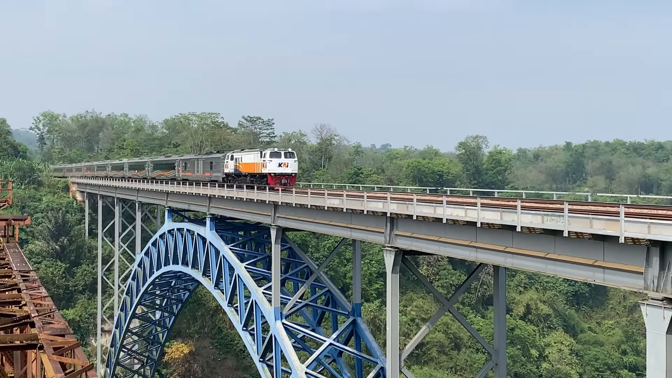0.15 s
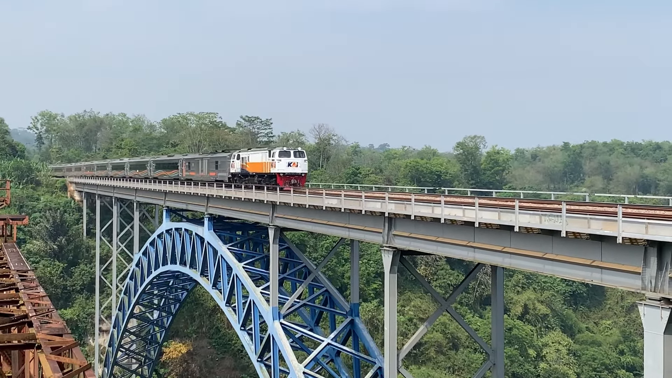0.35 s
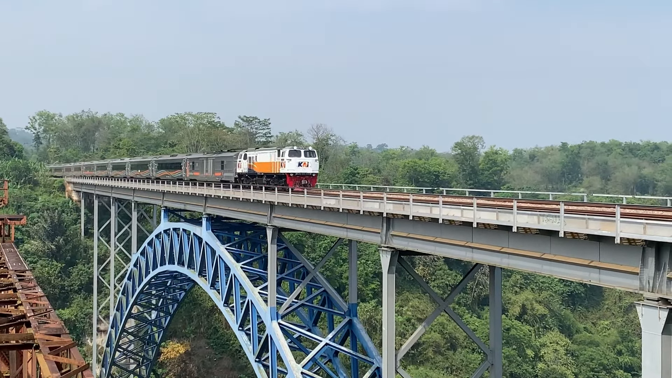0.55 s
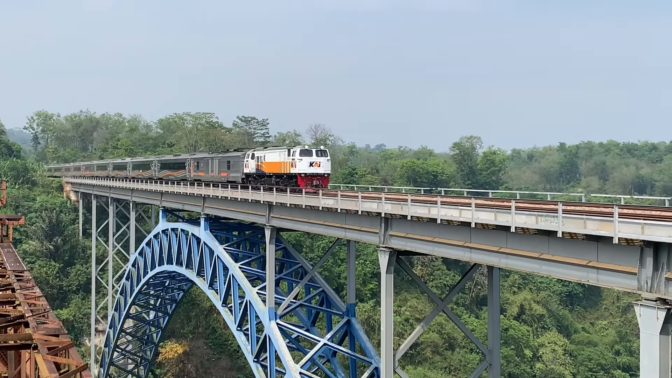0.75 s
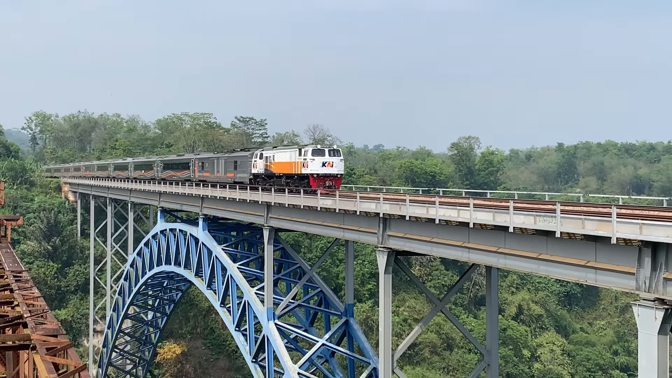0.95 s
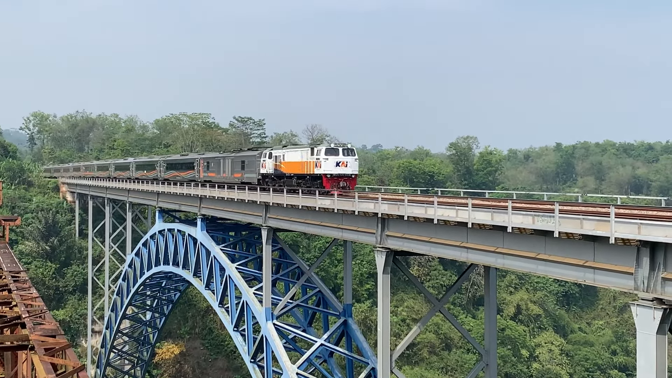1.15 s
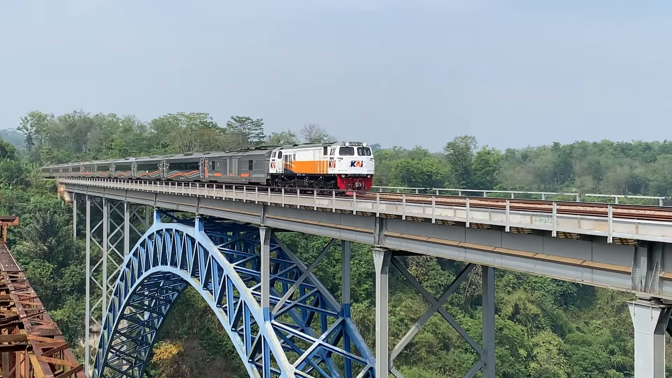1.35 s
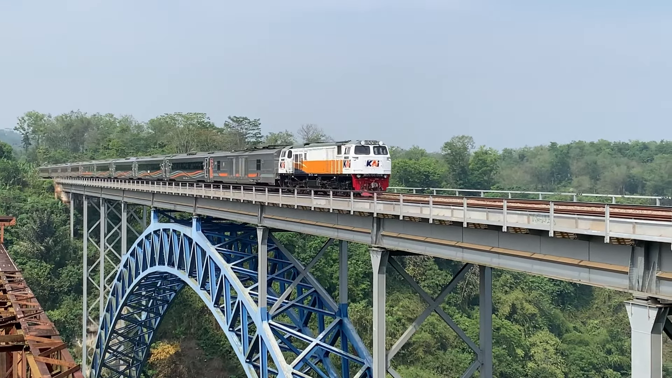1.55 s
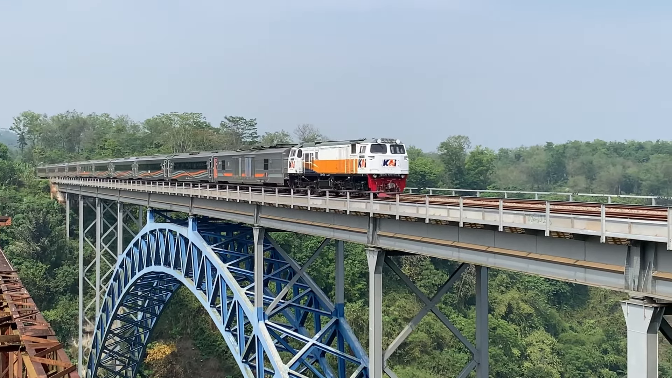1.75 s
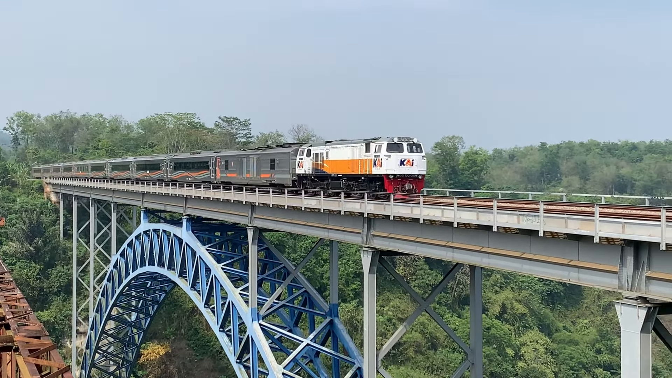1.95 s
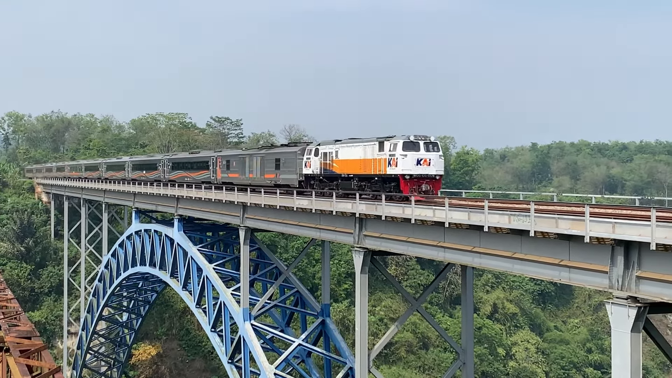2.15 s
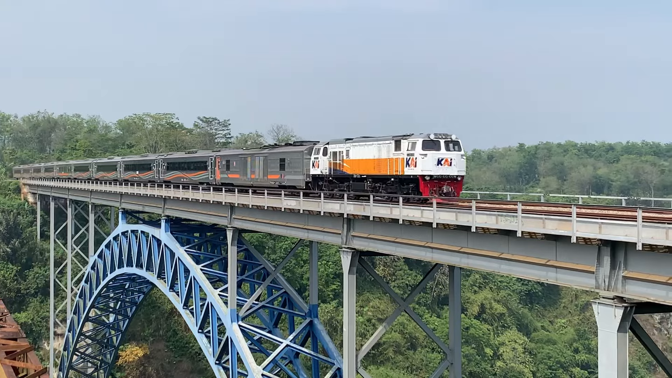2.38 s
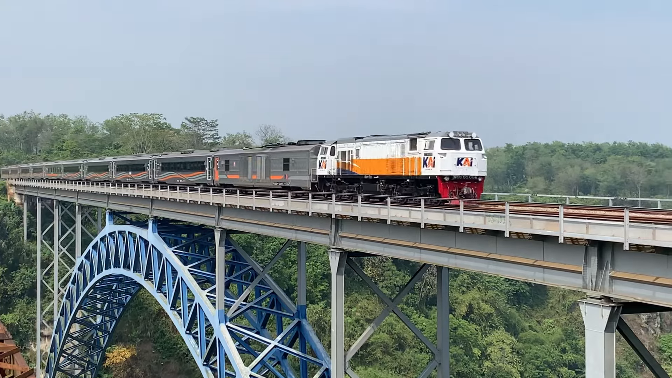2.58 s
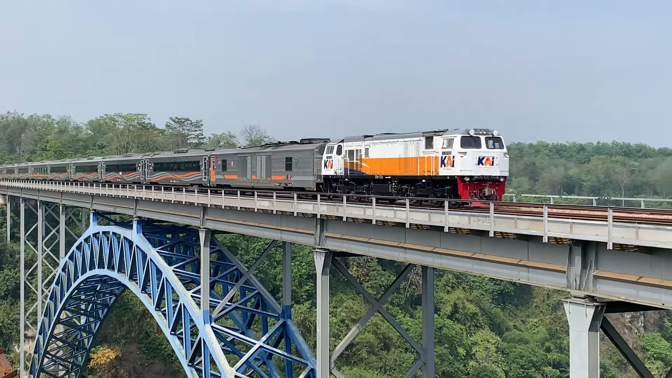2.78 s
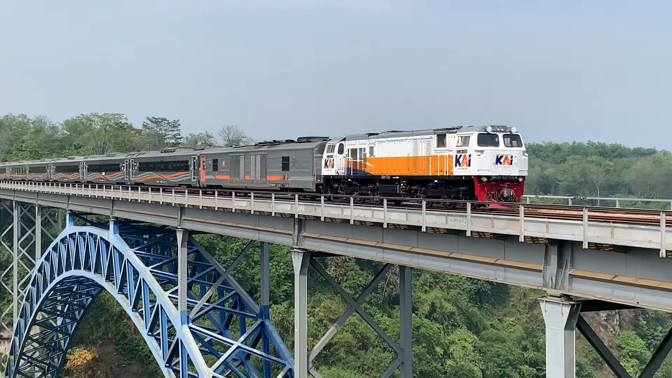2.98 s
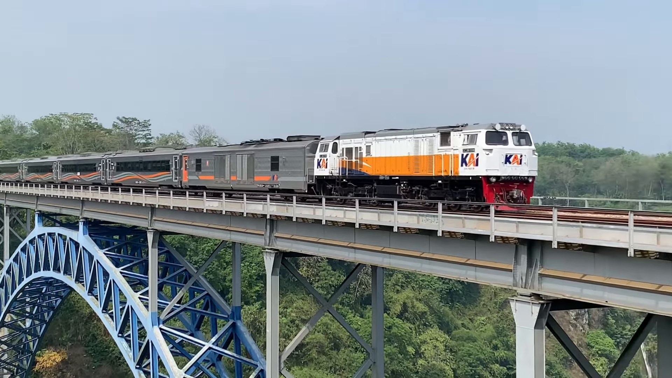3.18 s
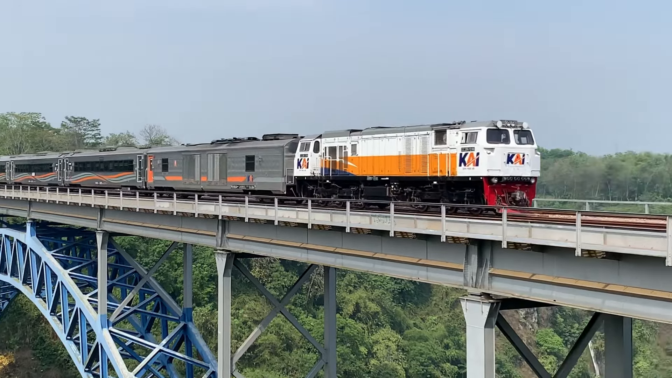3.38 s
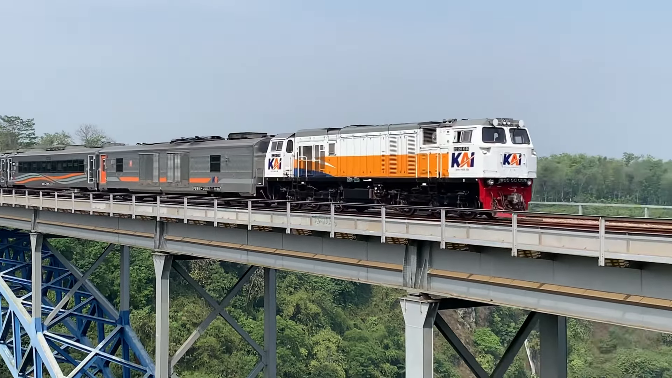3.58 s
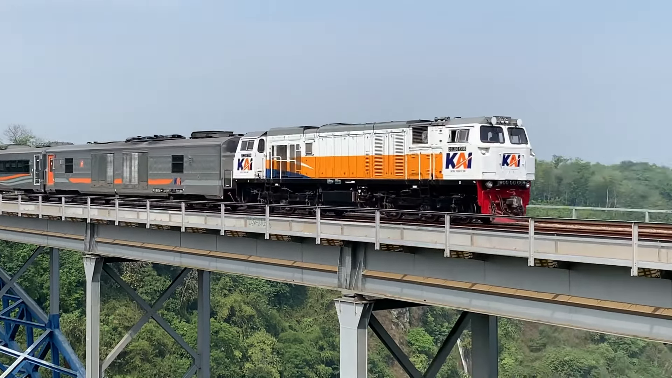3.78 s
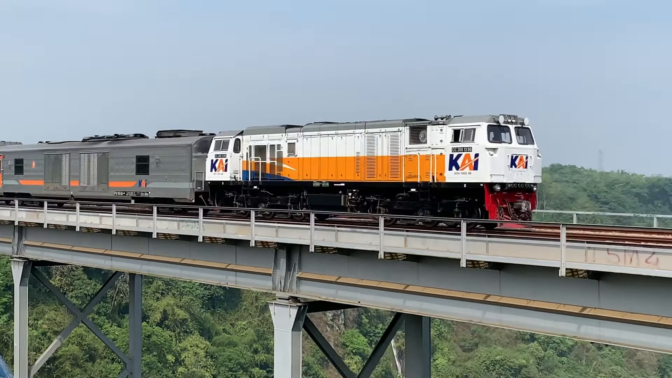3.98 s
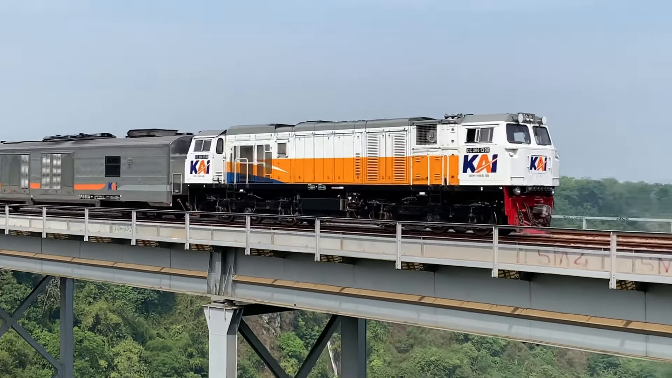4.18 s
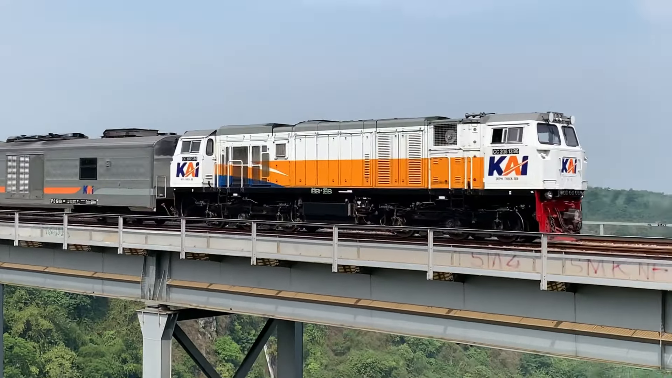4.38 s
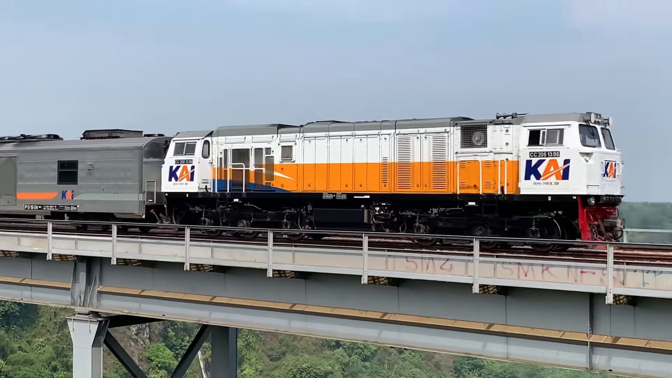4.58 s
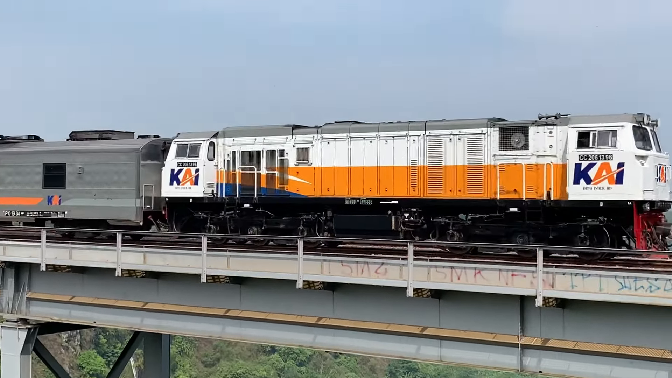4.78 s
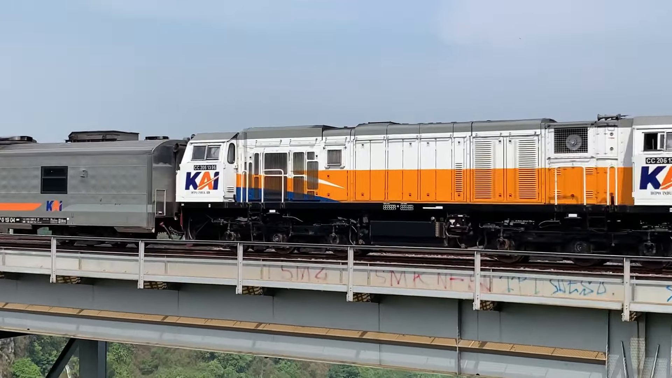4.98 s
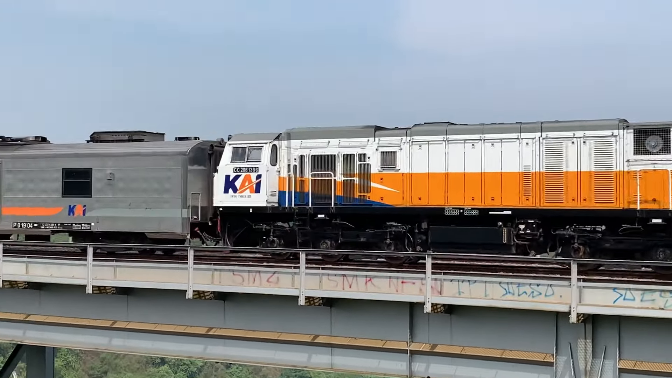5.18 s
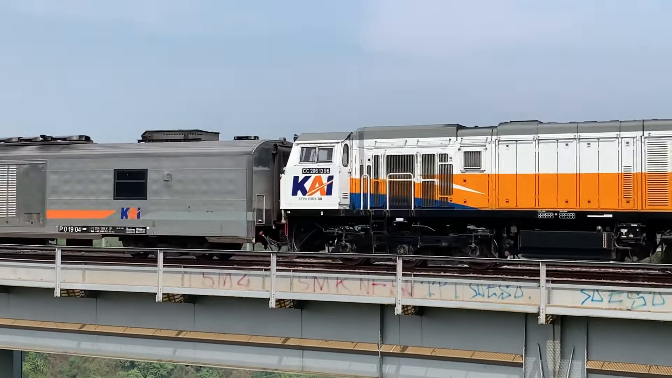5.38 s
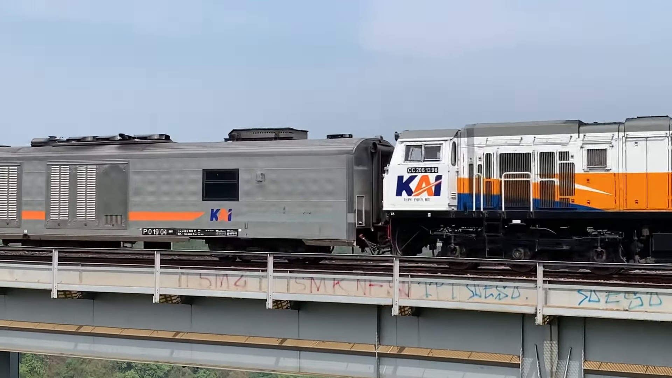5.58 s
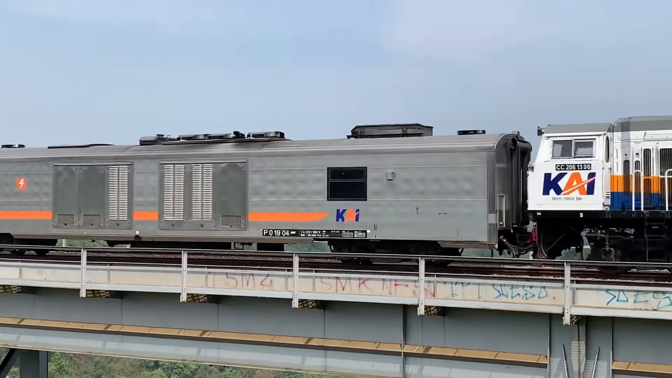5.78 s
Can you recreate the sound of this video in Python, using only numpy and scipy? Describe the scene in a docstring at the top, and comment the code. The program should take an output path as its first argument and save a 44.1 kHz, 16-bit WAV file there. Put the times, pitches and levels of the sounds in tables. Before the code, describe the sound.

A throbbing diesel train draws near on a droning steel bridge, its wheels hissing, ringing and clacking louder as it comes level.

```python
"""A diesel train approaches over a steel bridge, heard from the side of a valley.
At first the engine throbs far off, the deck rumbles and the girders drone, with insects faint in the trees.
Rough wheels and rails roll, hiss and ring; after a second or so the deck thumps and rail joints clack.
From about two seconds gears whine. As the engine draws level the sound swells and brightens,
and the Doppler-raised pitch of wheels and gears falls."""
import sys
import numpy as np
from scipy import signal
from scipy.fft import rfft, irfft, next_fast_len
from scipy.io import wavfile
from scipy.ndimage import uniform_filter1d, map_coordinates

SR = 44100
rng = np.random.default_rng(int(sys.argv[2]) if len(sys.argv) > 2 else 0)


def dump_mix(stems):
    """Bounce the given channels to the path in sys.argv[1] as a 16-bit WAV at rate SR."""
    frames = np.atleast_2d(stems).T  # one column per channel
    limited = np.clip(frames, -1, 1)  # hard clip at full scale
    pcm = np.round(limited * 32767).astype(np.int16)
    wavfile.write(sys.argv[1], SR, pcm)


N = 257544

# Noise spectra of the sources: frequency_hz, relative_density_db
DECK_SPECTRUM = [(50, -49), (80, -9.5), (103, -4), (134, -1), (168, -3.5), (232, -2.5), (336, -7),
                 (400, -15), (520, -27.5), (880, -120)]
GIRDER_SPECTRUM = [(240, -38), (400, -9), (481, 0), (531, -1.5), (716, -6.5), (800, -9), (915, -14.5),
                   (1000, -12), (1230, -14.5), (1320, -21.5), (1400, -23), (1820, -25), (3080, -120)]
ENGINE_SPECTRUM = [(15, -57), (30, -40), (40, -4.5), (48, -7.5), (66, 1.5), (85, 0.5), (110, -20),
                   (200, -81)]
ROLLING_SPECTRUM = [(900, -51), (1400, 3.5), (1650, -2.5), (2050, -1), (2330, -1), (2500, -2.5),
                    (2680, -2.5), (2900, 0), (3160, -1.5), (3450, -3), (3700, -2.5), (4050, -6), (4300, -4),
                    (4520, -8), (4700, -8), (5200, -31), (7000, -27.5)]
HISS_SPECTRUM = [(3500, -30), (5000, 0), (6500, -2), (8000, -3), (10000, -6.5), (12000, -10.5),
                 (14000, -16), (15100, -21)]
INSECT_SPECTRUM = [(4200, -29), (4580, 0), (4680, 5), (4850, 10), (4950, -12), (5300, -68)]
TREE_SPECTRUM = [(300, -2), (1000, -10), (2000, -4), (4000, -1), (5200, -10), (6200, 3), (8000, -25),
                 (11000, -30), (11800, -55), (15000, -70)]
# Levels as the engine runs onto nearer spans: time_s, deck_db, girder_db, hiss_db, engine_db
APPROACH_LEVELS = [(0, -28, -37.5, -63.5, -34.5), (.5, -25, -37.5, -64.5, -32), (1, -26, -35.5, -60.5, -32),
                   (1.41, -26, -34.5, -58, -28.5), (1.52, -21.5, -31.5, -51, -31),
                   (1.82, -22.5, -32.5, -49.5, -28.5), (1.96, -24.5, -32, -56.5, -28),
                   (2.12, -20, -31, -49.5, -25.5), (2.5, -22.5, -31, -48, -31), (3.05, -23, -31, -50, -29),
                   (3.38, -20.5, -29.5, -46.5, -34), (3.72, -21, -28, -44, -21.5), (4, -21, -27, -46, -30),
                   (4.25, -20, -27, -43, -24.5), (4.58, -19, -27.5, -41.5, -21),
                   (4.7, -17, -24, -41.5, -21.5), (4.95, -16, -23.5, -37.5, -22),
                   (5.08, -16.5, -25, -40, -19.5), (5.4, -17, -23, -39, -21.5),
                   (5.84, -17, -25, -40.5, -22.5)]
# Resonances at rest: pitch_hz, width_hz, relative_level_db, flicker_db, start_s, end_s
GIRDER_MODES = [(480, 50, -9.5, 1, .75, 4.12), (478, 40, -10, 1.5, 4.75, 5.52), (700, 90, -9, 1, 0, .7),
                (620, 70, -12, 1.5, 4.6, 6), (745, 140, -9, 1, 4.6, 6)]
WHEEL_MODES = [(945, 50, -8.5, 1.5, .75, 2.1), (945, 60, -12, 1.5, 2.15, 4.3),
               (2040, 280, -11, 1, 1.52, 1.85), (2860, 200, -14.5, 2, 3.9, 5.45),
               (2885, 90, -12, 1.5, 0, 2.2), (2900, 60, -10.5, 1.5, 2.3, 4.7),
               (2895, 60, -11, 1.5, 4.87, 5.45), (2890, 90, -11, 2, 5.64, 6),
               (4190, 60, -17.5, 2, 3.1, 3.65), (4170, 110, -21, 2, 4.1, 6),
               (3955, 50, -15, 1.5, 4.98, 5.28), (5815, 70, -22, 2, 5.42, 5.8),
               (9020, 60, -27, 3, 1.66, 1.78), (1145, 150, -4.5, 1.5, 1, 3.8),
               (1160, 260, -5.5, 1.5, 3.95, 6), (975, 170, -6, 1.5, 4.4, 6), (1840, 150, -10, 1.5, 0, 6),
               (1985, 170, -11.5, 1.5, 0, 6), (2000, 40, -15, 1.5, .75, 1.4),
               (2410, 110, -13, 1.5, .7, 1.5), (2385, 190, -13, 1, 0, 6), (2170, 200, -14, 1, 4.4, 6),
               (3210, 120, -14, 1.5, 0, 4.95), (3400, 90, -14, 1.5, 0, 3.4),
               (3380, 100, -13, 1.5, 3.45, 5.2), (3310, 260, -12.5, 1, 5, 6), (3670, 60, -16, 1.5, 0, 4.9),
               (3665, 90, -18, 1.5, 5, 6), (3660, 30, -17, 1.5, 3.3, 3.75), (3665, 30, -15, 1.5, 4.3, 4.75)]
# Blows on the deck: start_s, level_db, pitch_hz
DECK_BLOWS = [(1.371, -12.5, 271), (1.608, -7, 103), (2.042, -6, 105), (2.709, -8, 234), (3.753, -1.5, 137),
              (4.702, -8, 82.6), (4.76, -3.5, 205), (4.845, -8, 184), (4.921, -9, 62), (5.11, -5, 137),
              (5.346, -6, 137), (5.391, 2, 157), (5.43, -2, 206), (5.52, -15, 209), (5.599, -5.5, 129)]
# Brief surges of a wheel mode: peak_s, heard_pitch_hz, peak_db, length_s
WHEEL_FLARES = [(0.667, 3080, -48, 0.05), (1.771, 1004, -33, 0.042), (1.988, 3010, -38, 0.04),
                (2.356, 3060, -32, 0.043), (2.473, 3100, -30, 0.0088), (2.552, 3000, -39, .03),
                (2.84, 1187, -33, 0.047), (3.06, 1226, -34.5, 0.078), (3.107, 3060, -28.5, 0.016),
                (3.245, 1225, -30, 0.018), (3.308, 3120, -35.5, 0.046), (3.35, 1180, -37, .06),
                (3.41, 3800, -43, 0.045), (3.841, 3070, -36, 0.049), (3.957, 3070, -28, 0.043),
                (4.182, 3005, -35, 0.036), (4.195, 4390, -37, 0.041), (4.36, 3090, -30, 0.034),
                (4.435, 3020, -28, 0.046), (4.444, 4370, -39, 0.036), (4.526, 3080, -28.5, 0.09),
                (4.619, 4330, -37, .06), (4.7, 4340, -36.5, 0.08), (4.872, 3020, -22.5, 0.035),
                (4.97, 3490, -30.5, 0.052), (5.051, 3000, -21.5, 0.031), (5.165, 2995, -31, 0.04),
                (5.23, 2975, -38, 0.045), (5.22, 1830, -29, 0.029), (5.43, 5935, -45, 0.032),
                (5.49, 1150, -22, 0.015), (5.582, 5935, -40, 0.042), (5.614, 4265, -32.5, 0.086),
                (5.672, 5950, -43, 0.066), (5.778, 4230, -37, 0.056), (5.619, 1044, -25.5, 0.056),
                (5.665, 955, -24.5, 0.11)]
# Tones of traction gears and a singing wheel, at rest: pitch_hz, relative_level_db, start_s, end_s
WHINE_TONES = [(944, -8, 2.15, 2.4), (944, -3, 2.48, 3.4), (942, -6, 3.45, 4.2), (1410, -12, 3.8, 4.2),
               (1403, -10, 4.4, 5.2), (1400, -10, 5.66, 5.74), (2900, -16, 3.8, 4.6),
               (2900, -13, 4.87, 5.3)]
# Wheel impacts at rail joints: start_s, clack_db, knock_db
JOINT_IMPACTS = [(1.499, -45, -54), (1.6097, -40, -42), (2.3344, -46, -47), (2.5775, -40.5, -49),
                 (2.7134, -45, -50), (5.2015, -37, -26), (5.4094, -40, -36), (5.7364, -32, -26)]
# Response of two microphone ports (side relative to mid, phase lead of the right port):
# frequency_hz, far_side_db, near_side_db, far_lead_rad, near_lead_rad, left_over_right_db
PORT_RESPONSE = [(30, -27, -27, 0, 0, .4), (100, -27, -27, -.1, -.1, 0), (280, -21, -21, -.2, -.2, -1),
                 (550, -16, -16, 0, 0, 3), (900, -10, -8, .1, .4, 3.5), (1200, -14, -12, .2, .5, 2.5),
                 (1600, -11, -8.5, .3, .6, 3.5), (1950, -7.5, -7.5, 0, .8, 5),
                 (2500, -5.5, -1.3, -1.2, 0, 7), (3100, -9.5, -4, -1, -1.5, 2.5), (3800, -8, -5, -.4, 0, 3),
                 (4600, -5, -2.7, -.3, 1, 1.5), (5200, -1.3, -2.7, -.8, 2.5, 0),
                 (5900, -1.8, -2.7, -.9, 1, -4.5), (6300, -7.5, -3.5, -.4, -.8, -2.5),
                 (7300, -6, -2, 0, .5, 0), (8000, -5, -5, 1.2, 2, 1), (8600, -18, -16, 3.1, 3.1, 0),
                 (9300, -6.5, -6.5, 4.5, 4.5, 0), (10200, -14, -14, 6.3, 6.3, 0),
                 (14800, -14, -14, 15.7, 15.7, 0)]

TRAIN_M_PER_S, SOUND_M_PER_S, TRACK_DISTANCE_M = 20, 343, 30
ENGINE_ABREAST_S, WHEELS_NEAREST_S = 6.1, 5.2
ENGINE_BEAT_HZ, BAND_LIMIT_HZ = 45.6, 15095
TIME_S = np.arange(N) / SR


def bridge():
    """Forced vibration: wheel roughness shakes the deck and excites the girders' resonances."""
    deck_db, girder_db, _, _ = approach_levels()
    girders = noise(GIRDER_SPECTRUM, patchy_db=1.5)
    girders += resonances(GIRDER_MODES, 2 * np.pi * TIME_S, flicker_hz=7.4)
    deck = amp(deck_db + 0.78 * wobble(9)) * noise(DECK_SPECTRUM, patchy_db=0.5)
    return deck + amp(girder_db + 0.4 * wobble(16)) * girders


def engine():
    """Low-frequency radiation: the diesel throbs, and its lowest beat carries best from close by."""
    *_, engine_db = approach_levels()
    throb = amp(engine_db) * noise(ENGINE_SPECTRUM, patchy_db=-1.0)
    beat_db = engine_db - 14.5 + 9 * during(3.4, 6) + 2.5 * wobble(2.9)
    throb[0] += amp(beat_db) * np.sin(ENGINE_BEAT_HZ * doppler_phase() + 0.49 * wobble(4.7))
    return throb


def deck_thumps():
    """Damped oscillation: each blow on the deck rings at one low pitch and dies away."""
    out = np.zeros((2, N))
    t = np.arange(SR // 10) / SR
    for start_s, level_db, hz in DECK_BLOWS:
        envelope = impact(t, level_db, rise_s=0.0088, t60_s=0.092)
        out[0, round(start_s * SR):][:len(t)] += envelope * np.sin(2 * np.pi * hz * t)
    return out


def rolling():
    """Roughness excitation: broad noise and hiss pulse together as axles pass over rough rail."""
    _, _, hiss_db, _ = approach_levels()
    axles_db = .6 * wobble(14) + .6 * wobble(7)
    roll = amp(rolling_db() - 2 + axles_db) * noise(ROLLING_SPECTRUM, patchy_db=1.6)
    return roll + amp(hiss_db + axles_db) * noise(HISS_SPECTRUM, patchy_db=1.7)


def wheel_ringing():
    """Resonance: each wheel mode radiates a narrow, Doppler-shifted band of noise."""
    return resonances(WHEEL_MODES, doppler_phase(), flicker_hz=15) * amp(rolling_db())


def gear_whine():
    """Tonal radiation: gears and a singing wheel give Doppler-shifted, slightly unsteady tones."""
    phase_per_hz = doppler_phase()
    whine = np.zeros(N)
    for hz, level_db, start_s, end_s in WHINE_TONES:
        gain = amp(level_db + 1.2 * wobble(17)) * during(start_s, end_s)
        whine += gain * np.sin(hz * phase_per_hz + .5 * wobble(18))
    return whine * amp(rolling_db())


def wheel_flares():
    """Transient resonance: a rough patch of rail makes one mode swell fast and fade more slowly."""
    out = np.zeros((2, N + SR))
    t = np.arange(-SR // 4, SR // 4) / SR
    length_share = np.where(t < 0, 0.37, 0.72)  # rise, fall
    quadrature = np.array([[0], [np.pi / 2]])
    for peak_s, hz, peak_db, length_s in WHEEL_FLARES:
        swell = amp(peak_db) * np.exp(-(t / (length_share * max(length_s, .01))) ** 2)
        wander = .05 * np.cumsum(rng.standard_normal(len(t)))
        tone = np.sin(2 * np.pi * hz * t + wander + quadrature)
        out[:, round(peak_s * SR) - SR // 4:][:, :len(t)] += swell * tone
    return out[:, :N]


def rail_joints():
    """Impact noise: a wheel crossing a joint gives a bright clack and a duller, longer knock."""
    t = np.arange(SR // 10) / SR
    clack, knock = np.zeros((2, N + SR))
    for start_s, clack_db, knock_db in JOINT_IMPACTS:
        clack[round(start_s * SR):][:len(t)] += impact(t, clack_db, rise_s=0.0018, t60_s=0.087)
        knock[round(start_s * SR):][:len(t)] += impact(t, knock_db, rise_s=0.0035, t60_s=0.13)
    clacks = clack[:N] * noise(HISS_SPECTRUM, patchy_db=1)
    return clacks + knock[:N] * noise(ROLLING_SPECTRUM, patchy_db=1.5)


def valley():
    """Ambient noise: insects chirr in a narrow band over the broad rustle of air in the trees."""
    insects = amp(-61 + 1.5 * wobble(2.8)) * noise(INSECT_SPECTRUM, patchy_db=-1.5)
    return insects + amp(-63) * noise(TREE_SPECTRUM, patchy_db=3)


def approach_levels():
    """Linear interpolation: deck, girder, hiss and engine levels in dB at every sample."""
    times_s, *columns = np.transpose(APPROACH_LEVELS)
    return [np.interp(TIME_S, times_s, level_db) for level_db in columns]


def rolling_db():
    """Geometric spreading: the rolling level grows with nearness and shares the hiss's changes."""
    _, _, hiss_db, _ = approach_levels()
    distance_m = np.hypot(TRAIN_M_PER_S * (WHEELS_NEAREST_S - TIME_S), TRACK_DISTANCE_M)
    spreading_db = -20 * np.log10(distance_m)
    return -39 + 1.17 * (spreading_db - spreading_db.mean()) + 0.35 * (hiss_db - hiss_db.mean())


def doppler_phase():
    """Doppler effect: phase per Hz of a tone on the train, raised in pitch while it approaches."""
    ahead_m = TRAIN_M_PER_S * (ENGINE_ABREAST_S - TIME_S)
    closing_mach = TRAIN_M_PER_S / SOUND_M_PER_S * ahead_m / np.hypot(ahead_m, TRACK_DISTANCE_M)
    return 2 * np.pi * np.cumsum(1 / (1 - closing_mach)) / SR


def resonances(modes, phase_per_hz, flicker_hz):
    """Random modulation: each mode's tone widens into two independent, flickering narrow noises."""
    out = np.zeros((2, N))
    for hz, width_hz, level_db, flicker_db, start_s, end_s in modes:
        gate = during(start_s, end_s)
        heard = np.flatnonzero(gate)
        n, phase = len(heard), hz * phase_per_hz[heard]
        gain = amp(level_db + flicker_db * wobble(flicker_hz, n)) * gate[heard]
        for channel in out:
            band = wobble(width_hz, n) * np.cos(phase) + wobble(width_hz, n) * np.sin(phase)
            channel[heard] += gain * band
    return out


def noise(spectrum, patchy_db):
    """Spectral shaping: two noises of rms 1 share patches of random gain in time and frequency."""
    white = signal.stft(rng.standard_normal((2, N)), nperseg=512)[2]
    patches = uniform_filter1d(rng.standard_normal(white.shape[1:]), size=6, axis=0)
    patches = uniform_filter1d(patches, size=12, axis=1)
    pair = signal.istft(white * amp(patchy_db * unit(patches)), nperseg=512)[1][:, :N]
    knots_hz, density_db = np.transpose(spectrum)
    return unit(filtered(pair, lambda hz: amp(np.interp(np.log1p(hz), np.log1p(knots_hz), density_db))))


def impact(t, level_db, rise_s, t60_s):
    """Exponential damping: a quick rise and a fall of 60 dB in t60_s."""
    return amp(level_db - 60 * t / t60_s) * (1 - np.exp(-t / rise_s))


def during(start_s, end_s):
    """Gating: 1 between two times, with 60 ms fades outside them."""
    return np.clip(np.minimum(TIME_S - start_s, end_s - TIME_S) / .06 + 1, 0, 1)


def wobble(rate_hz, size=N):
    """Spline interpolation: a smooth curve through rate_hz random values a second."""
    positions = np.arange(size // 16 + 2) * 16 * min(rate_hz, 300) / SR
    coarse = map_coordinates(rng.standard_normal(2000), [positions])
    return np.interp(np.arange(size) / 16, np.arange(len(coarse)), coarse)


def filtered(x, response):
    """Linear filtering: the spectrum of x times a complex response of frequency."""
    size = next_fast_len(N + 8192)
    return irfft(rfft(x, size) * response(np.fft.rfftfreq(size, 1 / SR)), size)[..., :N]


def amp(db):
    """Amplitude ratio of a level in dB."""
    return 10 ** (np.asarray(db) / 20)


def unit(x):
    """Normalisation to rms 1."""
    return x / np.sqrt(np.mean(np.abs(x) ** 2) + 1e-20)


def stereo(pair, knots_hz, side_db, lead_rad, balance_db):
    """Partial coherence: a shared and an unshared signal reach two ports, differing in level and phase."""
    angle = lambda hz: np.arctan(amp(np.interp(hz, knots_hz, side_db)))
    mid, side = filtered(pair, lambda hz: np.array([np.cos(angle(hz)), np.sin(angle(hz))]))
    gain = lambda hz: amp(np.interp(hz, knots_hz, balance_db) / 2)
    left = lambda hz: gain(hz) * np.exp(-1j * np.interp(hz, knots_hz, lead_rad) / 2)
    return filtered(np.array([mid + side, mid - side]), lambda hz: np.array([left(hz), 1 / left(hz)]))


def scene():
    """Superposition: the sources add; as the train nears, the image widens and the top treble brightens."""
    pair = bridge() + engine() + deck_thumps() + rolling() + wheel_ringing()
    pair += gear_whine() + wheel_flares() + rail_joints() + valley()
    knots_hz, far_side_db, near_side_db, far_lead, near_lead, balance_db = np.transpose(PORT_RESPONSE)
    dulled = filtered(pair, lambda hz: amp(-5 * (hz / 15000) ** 2))
    far = stereo(dulled, knots_hz, far_side_db, far_lead, balance_db)
    near = stereo(pair, knots_hz, near_side_db, near_lead, balance_db)
    nearness = np.clip((TIME_S - 4) / 0.91, 0, 1)
    return (1 - nearness) * far + nearness * near


def record(dry):
    """Saturation and band limiting: a soft limiter rounds the loudest peaks; the top treble is cut."""
    rounded = dry / (1 + np.abs(dry / .85) ** 5) ** (1 / 5)
    return filtered(rounded, lambda hz: hz < BAND_LIMIT_HZ)


dry = scene()
out = record(dry)
dump_mix(out)
```